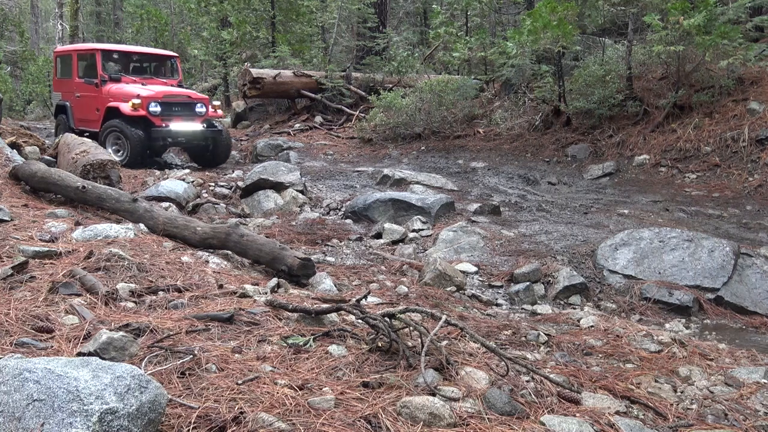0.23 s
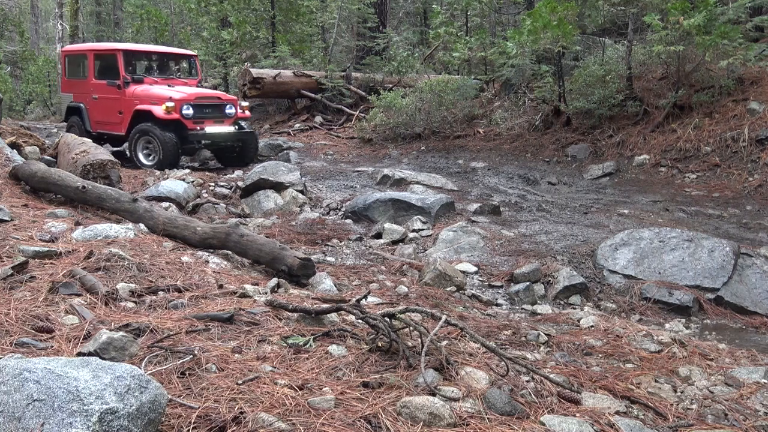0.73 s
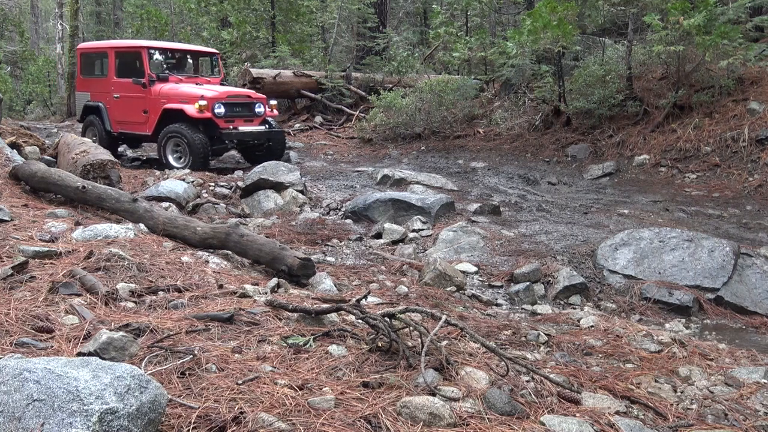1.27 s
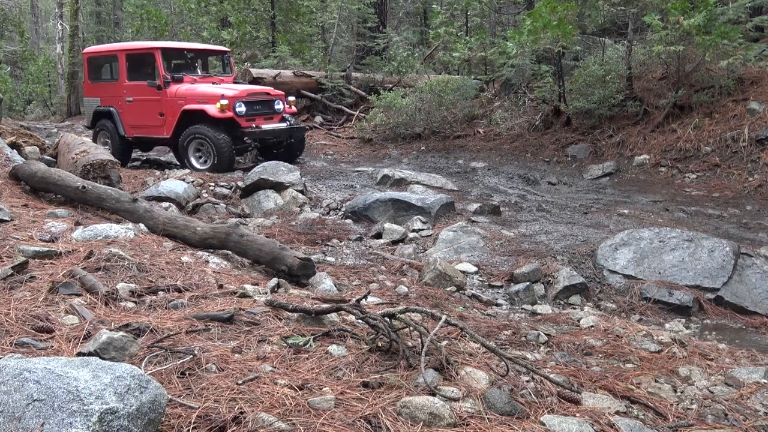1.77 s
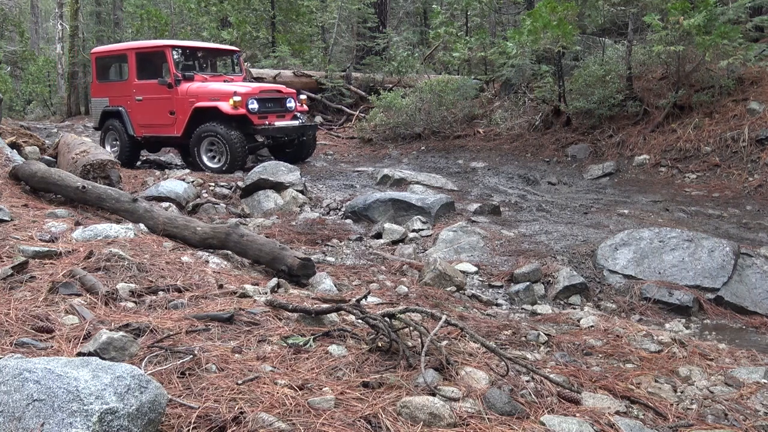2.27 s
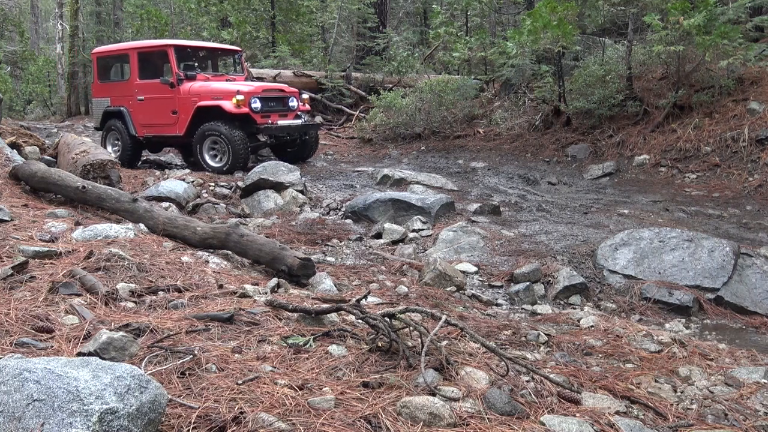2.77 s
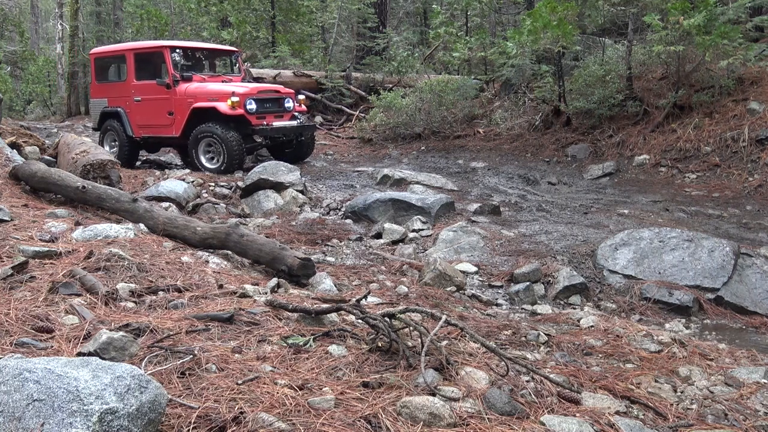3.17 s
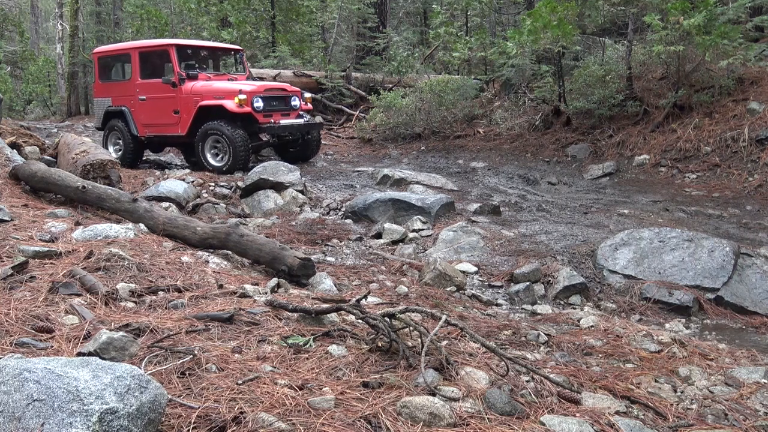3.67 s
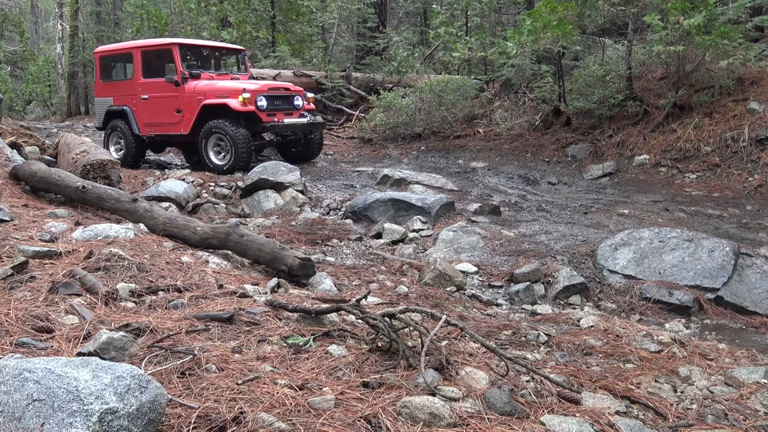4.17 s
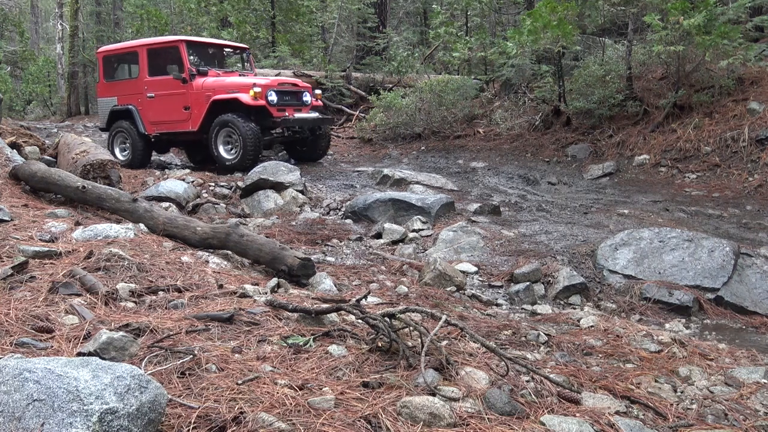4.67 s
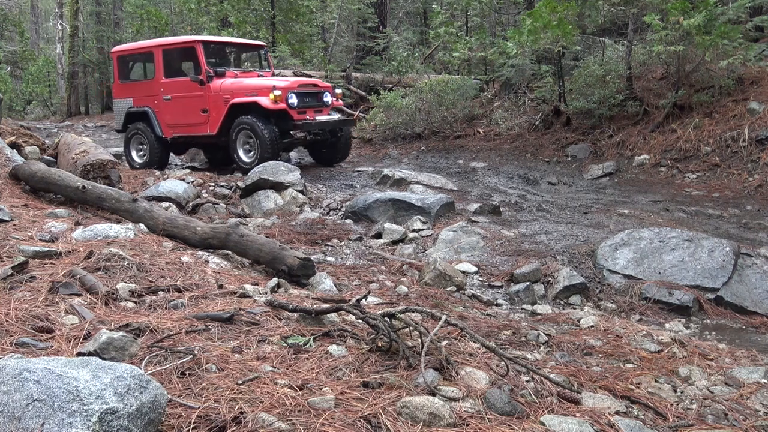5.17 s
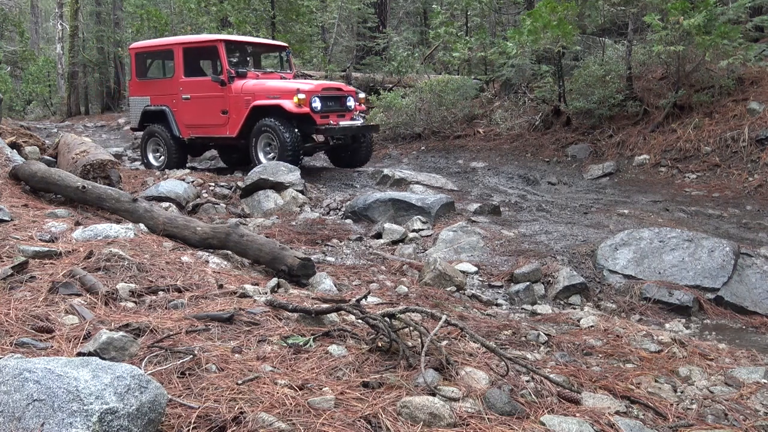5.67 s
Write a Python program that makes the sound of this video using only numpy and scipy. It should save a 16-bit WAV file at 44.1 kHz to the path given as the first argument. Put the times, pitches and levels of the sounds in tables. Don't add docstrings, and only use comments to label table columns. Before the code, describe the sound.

An outdoor microphone at moderate distance hears a four-wheel-drive creeping over rocks. Its deep lumpy exhaust slows to idle under a pump whine and soft valve clatter, with occasional grit squirts and a low knock. Two throttle surges follow, the second stronger and longer, with sharp gas spits. Stones bang and grit crunches as it ends, then the engine drops to a very slow throb after one bright knock.

```python
import sys
import numpy as np
from scipy import signal
from scipy.io import wavfile
from scipy.ndimage import uniform_filter1d

SR = 44100
rng = np.random.default_rng(int(sys.argv[2]) if len(sys.argv) > 2 else 0)


def undo_db(level):
    steps = np.asarray(level, float) / 20
    return 10 ** steps


def to_wav(s):
    ch = np.atleast_2d(s).T
    pcm = np.round(np.clip(ch, -1, 1) * 32767)
    wavfile.write(sys.argv[1], SR, pcm.astype(np.int16))


N = 260631


def rms_one(x):
    return x / np.sqrt(np.mean(x ** 2) + 1e-20)


def in_time(rows):
    s, *columns = np.transpose(rows)
    return [np.interp(np.arange(N) / SR, s, column) for column in columns]


def evened(x, span_s):
    return x / np.sqrt(uniform_filter1d(x ** 2, size=int(span_s * SR)) + 1e-12)


def drift(rate):
    r = np.exp(-80 * np.pi * rate / SR)
    noise = rng.standard_normal(N // 40 + 2002)
    slow = signal.lfilter([1], [1, -2 * r, r * r], noise)[2000:]
    return np.interp(np.arange(N) / 40, np.arange(len(slow)), rms_one(slow))


def released(db, db_per_s):
    fall_db = db_per_s * np.arange(N) / SR
    return np.maximum.accumulate(db + fall_db) - fall_db


def filtered(x, order, hz, kind):
    return signal.sosfilt(signal.butter(order, hz, kind, fs=SR, output="sos"), x)


def twice_resonant(x, hz, width):
    r = np.exp(-np.pi * width / SR)
    b = [(1 - r * r) / 2, 0, (r * r - 1) / 2]
    a = [1, -2 * r * np.cos(2 * np.pi * hz / SR), r * r]
    return signal.lfilter(b, a, signal.lfilter(b, a, x))


def coloured(x, spectrum, patchy_db):
    hz, db = np.transpose(spectrum)
    edges = hz[0] * 2 ** np.arange(0, np.log2(hz[-1] / hz[0]) + 1 / 9, 1 / 3)
    out, together = 0, drift(10.4)
    for k, (low, high) in enumerate(zip(edges, edges[1:])):
        band = filtered(x[k % len(x)], 2, [low, high], "band")
        level_db = np.interp(np.log(low * high) / 2, np.log(hz), db)
        out = out + band * undo_db(level_db + patchy_db * (0.63 * together + drift(24)))
    return rms_one(out)


def spurts(rows):
    jet = rms_one(np.diff(rng.standard_normal(N + 1)))
    top = rms_one(filtered(jet, 2, [10000, 13600], "band"))
    out, t = np.zeros(N), np.arange(1400) / SR
    burst = t / .002 * np.exp(1 - t / .002)
    linger = .22 * (1 - np.exp(-t / .001)) * np.exp(-t / .012)
    for s, db, hz, top_db in rows:
        span = slice(int(s * SR), int(s * SR) + len(t))
        body = rms_one(twice_resonant(jet[span], hz, 2100))
        out[span] += undo_db(db - 14.5) * (burst + linger) * (body + undo_db(top_db + 13.5) * top[span])
    return out


def forest(x):
    # (delay [ms], level [dB])
    echoes = [
        (23, -11),
        (41, -14),
        (67, -7.5),
        (95, -34),
    ]
    dull = filtered(x, 1, 3000, "low")
    return sum(undo_db(db) * np.pad(dull, (int(ms * SR / 1000), 0))[:N] for ms, db in echoes)


def rumble():
    shake = rms_one(twice_resonant(rng.standard_normal(N), 46, 22))
    return undo_db(-45.5 + 1.4 * drift(6.1)) * shake


def thuds():
    # (time [s], peak [dB])
    drops = [
        (1.459, -10.5),
    ]
    out, t = np.zeros(N), np.arange(int(.011 * SR)) / SR
    push = np.sin(2 * np.pi * t / t[-1]) * np.sin(np.pi * t / t[-1])
    for s, db in drops:
        out[int(s * SR):int(s * SR) + len(t)] -= undo_db(db) * push
    return out


def pump():
    # (time [s], tooth rate [Hz], level [dB], lag of the ground bounce [ms], tilt [dB per multiple])
    whine = [(0, 375, -4, 1.33, 0), (.55, 374.5, 0, 1.3, 0), (1.1, 373.7, 4, 1.29, 0),
             (1.55, 373.2, 1, 1.26, 0), (2.0, 372.5, -2.5, 1.18, .6), (3.65, 372.5, -2.5, 1.17, 0),
             (3.8, 372, -10, 1.17, 0), (4.9, 369.5, -11, 1.17, -3), (5.03, 369, -7, 1.17, -4.5),
             (5.91, 367, -4.5, 1.17, -4.5)]
    # (multiple of the tooth rate, level [dB])
    steady_lines = [(2, -47), (3, -46), (8, -53), (10, -52.5), (11, -50.5)]
    main_lines = [(5, -40), (6, -38.5), (7, -43)]   # (multiple, level [dB])
    bounce = .7
    hz, level_db, lag_ms, tilt_db = in_time(whine)
    phase = 2 * np.pi * np.cumsum(hz) / SR
    gains = [(k, undo_db(db)) for k, db in steady_lines]
    for k, db in main_lines:
        comb = np.abs(1 + bounce * np.exp(2j * np.pi * k * hz * lag_ms / 1000))
        gains.append((k, undo_db(db + level_db + tilt_db * (k - 6)) * comb))
    return sum(np.sqrt(2) * gain * undo_db(1.3 * drift(6)) * np.sin(k * phase) for k, gain in gains)


def engine_bay(cycles, load_db):
    # (frequency [Hz], density [dB per Hz])
    whir = [(430, -1), (560, -9.5), (760, -0.5), (1000, 1.5), (1300, -4), (1600, -0.5), (2000, -7),
            (2600, -5.5), (3300, -12.5), (4200, -10), (6000, -21.5)]
    idle_db, follows = -29, 0.69
    throb = 1 + 0.033 * np.cos(16 * np.pi * cycles)
    air = coloured(rng.standard_normal((2, N)), whir, patchy_db=1.18)
    return undo_db(idle_db + follows * load_db - 3.0) * throb * air


def squirts():
    # (time [s], peak [dB], centre [Hz])
    wet = [(0.1805, -14, 7400), (.7497, -23, 4560), (.8829, -16.5, 6000), (3.947, -5.5, 5140),
           (4.2123, -17, 5120), (4.345, -16, 4940), (4.5408, -14, 4650), (4.714, -22, 5750),
           (4.8224, -28, 5300), (4.8653, -21, 5560), (4.9432, -19, 5430), (5.03, -20.5, 7350),
           (5.6156, -25, 7670)]
    return spurts([(s, db, hz, -24) for s, db, hz in wet])


def grinding():
    # (time [s], level [dB], hold [s], extra level of the bright fizz [dB])
    grinds = [
        (0.517, -35, .01, 12),
        (0.876, -30, 0.0089, 9),
        (.95, -38, 0.29, 2.5),
        (4.565, -22.5, 0.076, -5),
        (4.673, -21.5, 0.052, 6),
        (4.874, -22, 0.0098, 6.5),
        (5.38, -36, 0.13, 10.5),
    ]
    # (frequency [Hz], density [dB per Hz])
    grit = [(290, -15), (500, -7), (883, -2.5), (1220, -6.5), (1480, -2.5), (2890, -20.5), (6110, -27),
            (8070, -35), (9000, -29), (11700, -43), (19800, -120)]
    rise_db_per_s, fall_db_per_s = 110, 129
    sizes = undo_db(3.5 * np.minimum(rng.exponential(1, (2, N)), 5)) * rng.choice([-1, 1], (2, N))
    grains_per_s = 5000 * undo_db(2 * drift(30))
    struck = rng.random((2, N)) < grains_per_s / SR
    grains = coloured(sizes * struck + 1e-9, grit, patchy_db=1.8)
    fizz = filtered(grains, 2, 1900, "high")
    out, t = np.zeros(N), np.arange(N) / SR
    for s, db, hold_s, fizz_db in grinds:
        fade_db = rise_db_per_s * np.maximum(s - t, 0) + fall_db_per_s * np.maximum(t - s - hold_s, 0)
        out += undo_db(db - 0.5 - fade_db) * (grains + (undo_db(fizz_db) - 1) * fizz)
    return out


def knocks():
    # (time [s], peak [dB], pitch [Hz])
    stones = [
        (0.679, -18, 2240),
        (0.945, -25, 2240),
        (1.364, -8, 468.5),
        (4.542, -14, 770),
        (4.592, 5.5, 920),
        (4.629, -2, 870),
        (4.679, -5, 450),
        (4.829, -4, 790),
        (4.87, -2, 900),
        (5.388, -1, 1500),
    ]
    out, t = np.zeros(N), np.arange(1800) / SR
    for s, db, hz in stones:
        blow = rng.standard_normal(len(t)) * t * np.exp(-t / 0.0059)
        hit = twice_resonant(blow, hz, 0.59 * hz)
        out[int(s * SR):int(s * SR) + len(t)] += undo_db(db - 13.0) * hit / np.abs(hit).max()
    return out


def leak(cycles, load_db):
    # (frequency [Hz], density [dB per Hz])
    hiss_colour = [(1760, -60), (3000, -1), (4110, -1), (4530, -5.5), (5100, -2.5), (6080, 2), (6660, -7.5),
                   (8510, 3.5), (9650, -14.5), (12900, -11.5), (16000, -25)]
    # (time [s], peak [dB])
    spits = [(3.0924, -15), (3.121, -14), (3.135, -16), (3.1604, -6), (3.1976, -20.5), (3.219, -13),
             (3.2326, -15), (3.2532, -9), (3.7121, -18), (3.7642, -18), (3.7976, -12), (3.816, -12),
             (3.846, -4.5), (3.8864, -11), (3.911, -9), (3.9457, -7.5), (4.0084, -8), (4.0851, -13),
             (4.1011, -21.5), (4.1445, -19), (4.1535, -14.5), (4.1696, -25), (4.2198, -20), (4.2344, -10),
             (4.286, -15.5), (4.368, -18.5), (4.4119, -22), (4.559, -11), (4.5775, -18), (4.7504, -12)]
    idle_db, follows = -43.5, 1.3
    spit_hz, spit_spread_hz, spit_top_db = 7880, 340, -31
    faint_db, faint_spread_db = -21, 4
    gate = 1 + .4 * np.cos(16 * np.pi * cycles) * np.clip(load_db / 6, 0, 1)
    gas = coloured(rng.standard_normal((2, N)), hiss_colour, patchy_db=1.0)
    hiss = undo_db(idle_db + follows * load_db + 1.5) * gate * gas
    every_second_firing = np.flatnonzero(np.diff(np.floor(4 * cycles)))
    luck = rng.standard_normal((300, 4))
    faint = []
    for i, (a, b) in zip(every_second_firing, luck[:, 2:]):
        if load_db[i] > 0:
            below_full_db = 2 * (load_db[i] - load_db.max())
            faint.append((i / SR + 0.013 * a, faint_db + faint_spread_db * b + below_full_db))
    jets = [(s, db, spit_hz + spit_spread_hz * a, spit_top_db - db / 2 + 3.4 * b)
            for (s, db), (a, b) in zip(list(spits) + faint, luck[:, :2])]
    return hiss + spurts(jets)


def racing(per_s):
    return np.clip((per_s - 11.96) / 2.4, 0, 1)


def orders(cycles, per_s, effort_db):
    firing_orders = [-3, -5, 4, -8, -4, 7, -1, -1, 5, 2, 3, -5, 2, 1, 2, -3, -1, 0, 1, -2, -2, 5, 0, 0, 4,
                     0, -1, -2, -3, -1, -3, -2, -1, -2]
    # (frequency [Hz], level [dB])
    pipe = [(25, -19), (45, -14), (62, -9), (78, -9), (92, -6), (108, -3), (125, -7), (145, -10),
            (170, -17), (200, -13), (240, -16), (290, -20), (350, -15), (410, -18), (470, -29)]
    # (orders, idle [dB], dB per dB of effort over idle, ceiling [dB], change when racing [dB])
    shifts = [((8,), 2.5, .25, 6.5, -13),
              ((3, 5, 11), -3, .8, 2.5, -1),
              ((9, 10, 24, 27), -8, .42, 0, 6.5)]
    idle_effort_db = -24.5
    race = racing(per_s)
    parts, power = np.zeros((2, N)), np.full((2, N), 1e-12)
    pipe_hz, pipe_db = np.transpose(pipe)
    for k, order_db in enumerate(firing_orders, start=3):
        level_db = np.interp(k * per_s, pipe_hz, pipe_db, right=-60) + order_db
        for members, idle_db, follows, ceiling_db, racing_db in shifts:
            if k in members:
                effort_shift_db = idle_db + follows * (effort_db - idle_effort_db)
                level_db = level_db + np.minimum(effort_shift_db, ceiling_db) + racing_db * race
        turns = k * cycles + rng.random() + .0045 * (1 - .8 * race) * k * drift(3)
        flicker = undo_db(2.2 * (1 - .6 * race) * drift(3.5))
        high = np.clip((k * per_s - 165) / 20, 0, 1)
        gain = np.array([1 - high, high]) * undo_db(level_db)
        parts += gain * flicker * np.sin(2 * np.pi * turns)
        power += gain ** 2 / 2
    return parts / np.sqrt(power)


def puffs(cycles, per_s):
    # (bank [0-1], strength [dB])
    cylinders = [(0.1, -7.5), (1, -25), (0.91, -9), (0, -14.5), (1, -14.5), (0, -3.5), (0, -5), (0.97, -6)]
    # (frequency [Hz], width [Hz], level [dB])
    boom_modes = [(112.3, 19.5, 6), (118, 14.6, -2)]
    # (frequency [Hz], width [Hz], level [dB])
    bark_modes = [(233, 58, 4.5), (309.5, 36, 8), (402.6, 69.4, 3.5)]
    # (frequency [Hz], width [Hz], level [dB])
    roar_modes = [(485, 184, 2.5), (880, 340, 6.5), (1110, 430, -4)]
    bank_lag_ms, misfire_db, jitter = 3.79, 4.5, 0.048
    bank, strength_db = np.transpose(cylinders)
    at = np.flatnonzero(np.diff(np.floor(8 * cycles)))
    which = np.arange(len(at)) % 8
    luck = rng.standard_normal((len(at), 2))
    late_s = bank[which] * bank_lag_ms / 1000 + jitter * luck[:, 0] / per_s[at] / 8
    train = 0.052 * rng.standard_normal(N)
    puff_at = np.clip(at + (late_s * SR).astype(int), 0, N - 1)
    train[puff_at] = undo_db(strength_db[which] + misfire_db * luck[:, 1])
    rung = []
    for modes in (boom_modes, bark_modes, roar_modes):
        ring = sum((-1) ** k * undo_db(db) * twice_resonant(train, hz, 1.61 * width)
                   for k, (hz, width, db) in enumerate(modes))
        rung.append(evened(ring, 0.16))
    return rung


def exhaust(cycles, per_s, effort_db):
    race = racing(per_s)
    low, high = orders(cycles, per_s, effort_db)
    boom, bark, roar = puffs(cycles, per_s)
    boom_db = effort_db - 4.5 * race
    sing_db = released(1.55 * np.maximum(per_s - 9.97, 0), 7)
    bark_gain = np.hypot(undo_db(effort_db - 12.5 + sing_db), undo_db(-35.5))
    clean = np.clip((per_s - 5) / 10.3, .1, .96)
    deep = .96 * low + .22 * (1 - .6 * race) * boom
    upper = np.sqrt(clean) * high + np.sqrt(1 - clean) * bark + undo_db(-13.0) * roar
    return undo_db(2.0) * (undo_db(boom_db) * deep + bark_gain * upper)


def scene():
    # (time [s], four-stroke cycles [per s])
    speed = [(0, 9.4), (.35, 9.2), (.75, 7.25), (1.3, 6.75), (2.0, 6.46), (2.88, 6.3), (3.03, 7.3),
             (3.29, 12.0), (3.5, 8.0), (3.66, 6.6), (3.8, 7.7), (4.1, 14.3), (4.26, 15.15), (4.54, 14.1),
             (4.72, 10.8), (5.0, 9.5), (5.39, 6.85), (5.78, 4.85)]
    # (time [s], level [dB])
    effort = [(0, -21), (.7, -21), (.82, -27.5), (2.83, -26), (2.93, -21), (3.07, -15), (3.13, -11),
              (3.29, -12), (3.55, -20), (3.76, -19), (3.81, -10), (4.0, -9), (4.8, -12), (4.9, -16.5),
              (5.25, -21.5), (5.34, -23.5), (5.82, -28.5), (5.91, -22.5)]
    per_s = uniform_filter1d(in_time(speed)[0], size=SR // 14, mode="nearest")
    cycles = np.cumsum(per_s) / SR
    effort_db = in_time(effort)[0]
    load_db = released(np.maximum(effort_db + 17.5, 0), 40)
    sharp = leak(cycles, load_db) + grinding() + knocks() + squirts()
    background = forest(sharp) + rumble() + thuds()
    engine = pump() + engine_bay(cycles, load_db) + exhaust(cycles, per_s, effort_db)
    return (background + engine + sharp)[None]


def top_cut(x):
    return signal.sosfilt(signal.butter(12, 16110, fs=SR, output="sos"), x)


def record(dry):
    rounded = 1.203 * np.tanh(dry / 1.19)
    cut = signal.cheby2(10, 50, 16300, fs=SR, output="sos")
    return top_cut(signal.sosfilt(cut, rounded))


dry = scene()
out = record(dry)
to_wav(out)
```